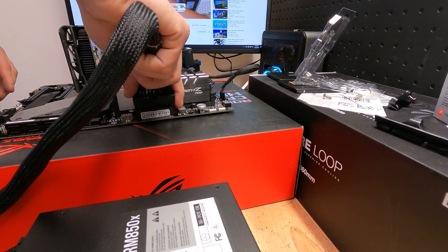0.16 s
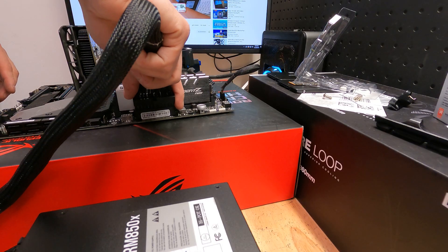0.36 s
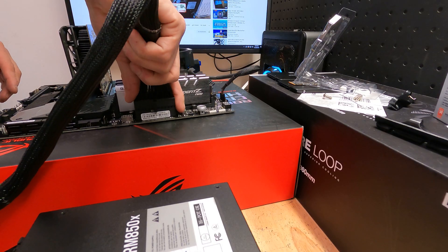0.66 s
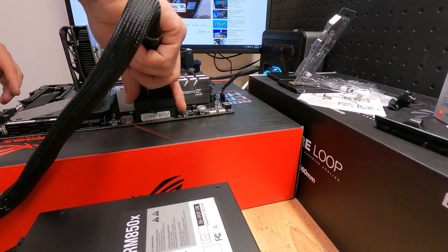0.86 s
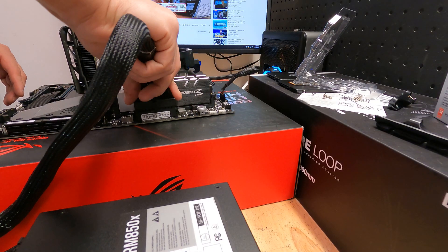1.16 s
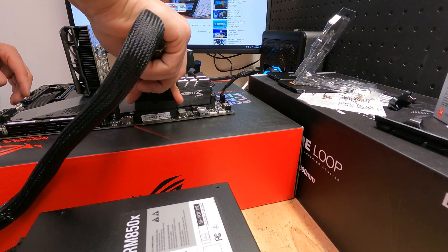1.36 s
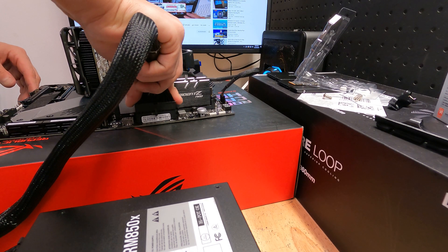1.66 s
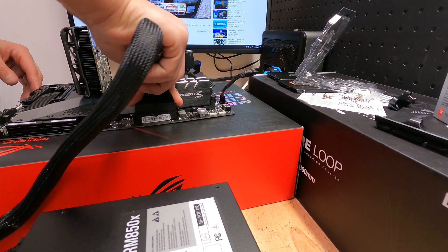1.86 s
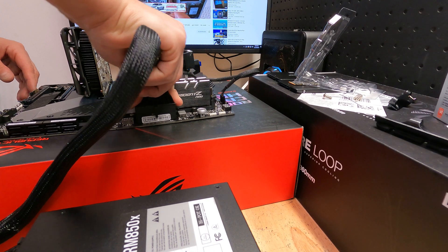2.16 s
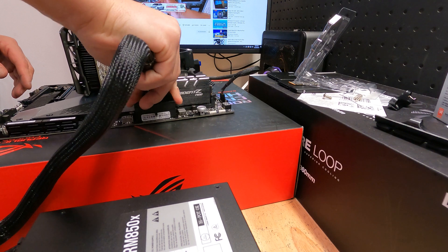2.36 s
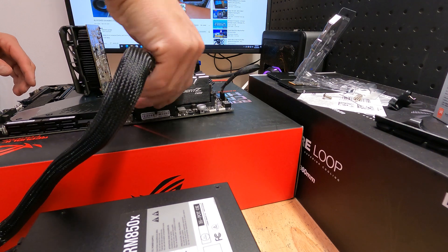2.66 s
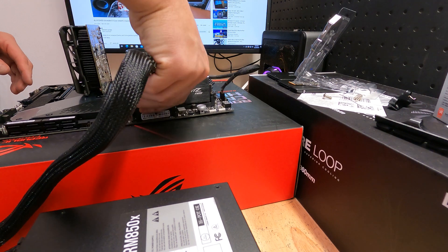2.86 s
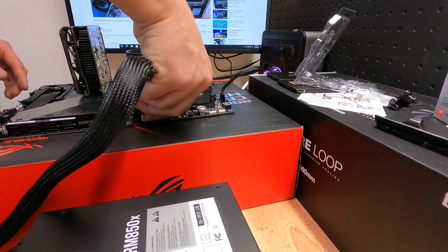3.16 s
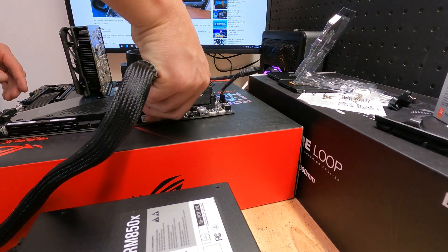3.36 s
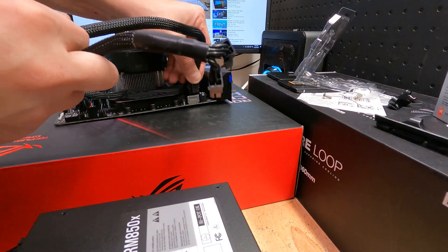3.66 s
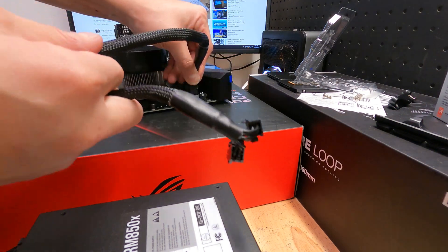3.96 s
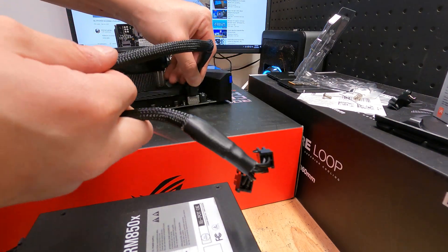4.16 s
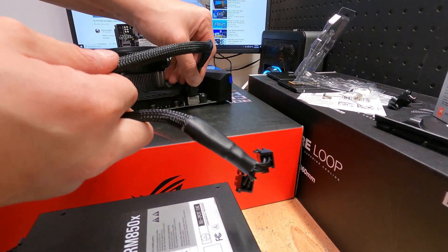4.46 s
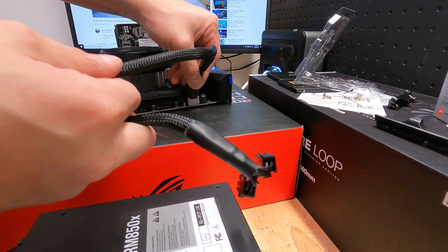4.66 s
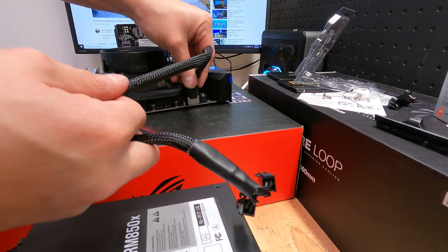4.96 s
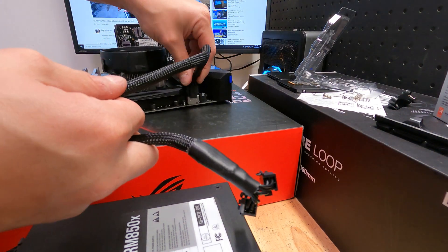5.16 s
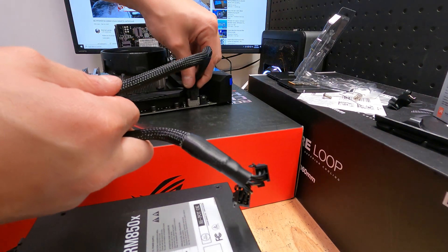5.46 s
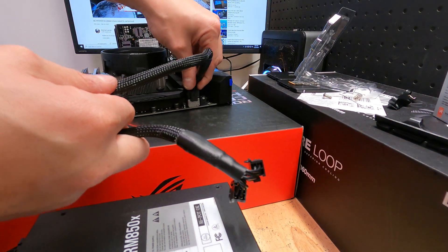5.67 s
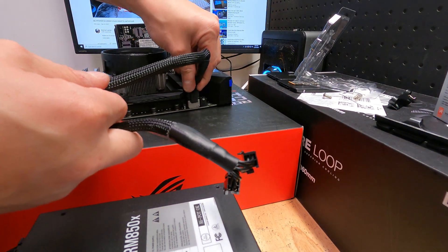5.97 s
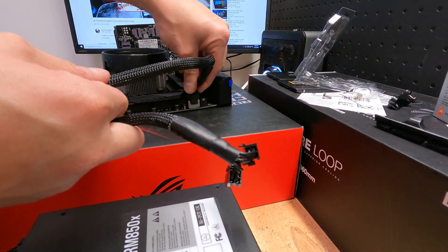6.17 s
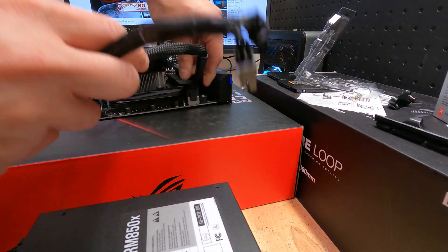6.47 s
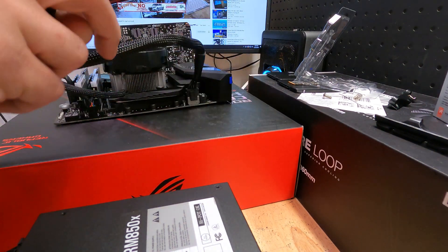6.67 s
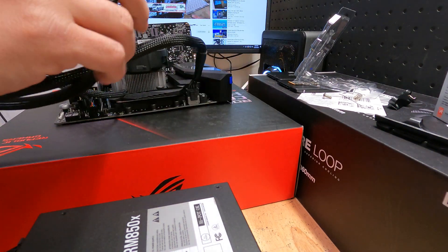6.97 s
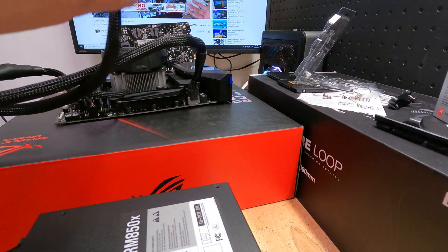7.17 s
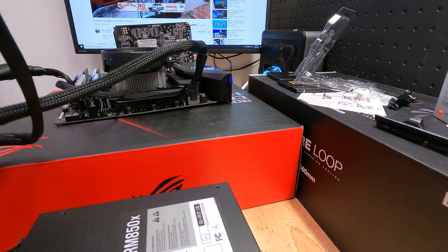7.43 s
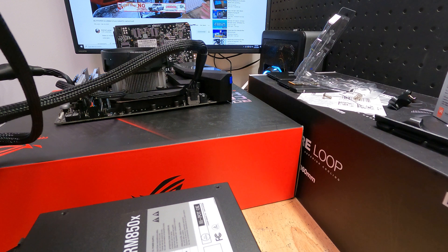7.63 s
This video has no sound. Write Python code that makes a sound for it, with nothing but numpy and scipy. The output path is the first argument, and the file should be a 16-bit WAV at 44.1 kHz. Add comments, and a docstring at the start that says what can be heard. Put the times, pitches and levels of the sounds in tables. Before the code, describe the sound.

Over the faint, steady rush of a fan, a tight plastic plug is worked into a circuit board lying on a cardboard box. It creaks, knocks and clicks home, the box thumping hollowly under each push while braided cables scrape softly. A second plug clicks once, then seats with the loudest snap, leaving a brief thin ring in metal cooler fins. The sound is close, in a small room.

```python
"""Over the steady rush of a fan come clicks and hollow thumps: power plugs are being worked into a
circuit board that lies on a cardboard box. The tight plastic creaks, knocks on the board and snaps home,
the box thumps under each push, and braided cable sleeves scrape. The second plug, behind the cooler,
snaps loudest and sets the fins ringing. A small room answers; the sound is close and almost mono."""
import sys
import numpy as np
from scipy import signal
from scipy.fft import rfft, irfft
from scipy.io import wavfile

SR = 44100
rng = np.random.default_rng(int(sys.argv[2]) if len(sys.argv) > 2 else 0)


def put_to_file(sound):
    """Save the sound as 16-bit audio at rate SR, in the file named by the first command-line argument."""
    columns = np.atleast_2d(sound).T  # one column per channel
    safe = np.clip(columns, -1, 1)
    whole_steps = np.round(safe * 32767)
    wavfile.write(sys.argv[1], SR, whole_steps.astype(np.int16))


N = 343980
T = np.arange(N) / SR
HIT_T = T[:SR * 3 // 4]  # time axis of one hit
SECOND_PLUG_S = 4.0  # later snaps come from behind the cooler


def undb(db):
    """Turn decibels into a gain."""
    return 10 ** (np.asarray(db) / 20)


def unit(x):
    """Scale to an energy of one."""
    return x / np.sqrt(np.sum(x ** 2))


def level(x, db):
    """Scale to an average (rms) level."""
    return x * undb(db) / np.sqrt(np.mean(x ** 2))


def hit_level(x, db):
    """Scale a hit as if all its energy fell within 10 ms."""
    return unit(x) * undb(db) * np.sqrt(SR / 100)


def add(out, s, x):
    """Mix x into out from time s."""
    i = max(int(s * SR), 0)
    out[i:i + len(x)] += x[:N - i]


def fade(t60):
    """Die away by 60 dB in t60 seconds."""
    return np.exp(-np.log(1000) * HIT_T / t60)


def band(x, hz, width_hz):
    """A resonance: keep the sound near one pitch."""
    b, a = signal.iirpeak(min(hz, SR / 2 - 1), hz / min(width_hz, SR / 4), fs=SR)
    return signal.lfilter(b, a, x + 1e-18)


def keep(x, hz, side, order=2):
    """Keep the "low" or the "high" side of hz."""
    return signal.sosfilt(signal.butter(order, min(hz, .45 * SR), side, fs=SR, output="sos"), x + 1e-18)


def ring(tones):
    """A struck object rings with several fading tones."""
    return sum(undb(db) * fade(t60) * np.sin(2 * np.pi * hz * HIT_T) for hz, db, t60 in tones)


# rush of the fan and room air: f/Hz, relative level/dB
AIR_SPECTRUM = [(15, -28.5), (25, -6), (38, -8.5), (64, -5.5), (119, -10), (209, -17.5), (297, -25),
                (340, -31), (378, -17.5), (410, -25), (482, -22), (666, -22), (1050, -20.5), (2170, -34.5),
                (15500, -45)]
# resonances of the fan housing: f/Hz, width/Hz, level/dB
FAN_RESONANCES = [(298.5, 14.5, -71.5), (1053, 1000, -70), (4220, 370, -83)]


def fan():
    """Air rushes steadily through the fan housing; the low rumble wavers."""
    air_hz, air_db = np.transpose(AIR_SPECTRUM)
    f = np.maximum(np.arange(N // 2 + 1) * SR / N, 1)
    shape = undb(np.interp(np.log(f), np.log(air_hz), air_db))
    air = level(irfft(rfft(rng.standard_normal(N)) * shape, N), db=-61)
    waver_db = 2 * level(keep(rng.standard_normal(N), 3.3, "low"), db=0)
    air += keep(air, 180, "low", order=1) * (undb(waver_db) - 1)
    housing = sum(level(band(rng.standard_normal(N), hz, width), db) for hz, width, db in FAN_RESONANCES)
    return air + housing


def room(x, low_t60=0.44, mid_t60=0.51):
    """Echoes in a small furnished room build up and blur; the treble dies first."""
    low, mid, high = rng.standard_normal((3, len(HIT_T)))
    tail = undb(1.5) * keep(low, 990, "low") * fade(low_t60)
    tail += keep(keep(mid, 900, "high"), 6000, "low", order=4) * fade(mid_t60)
    tail += undb(5) * keep(keep(high, 5500, "high"), 12000, "low") * fade(mid_t60 / 2)
    build_up = 1 - np.exp(-HIT_T / 0.01)
    return signal.fftconvolve(x, unit(tail * build_up))[:N]


# the hand leans in to seat a plug: t/s, level/dB, hold/s
HAND_LEANS = [(.1, -58.5, .5), (1.97, -45.5, .4), (4.75, -51.5, 0.13), (6.2, -52.5, .2)]


def sway(rise_s=0.12, fall_s=0.27):
    """The leaning hand rocks the box, moving air at the very bottom of hearing."""
    rumble = keep(band(rng.standard_normal(N), hz=6.4, width_hz=14.7), 31, "low")
    weight = undb(-61)  # a little is always there
    for s, db, hold_s in HAND_LEANS:
        before, after = np.maximum(s - T, 0), np.maximum(T - s - hold_s, 0)
        weight = weight + undb(db) * np.exp(-before / rise_s - after / fall_s)
    return level(rumble, db=0) * weight


def slips(length_s, per_s, spread_db=2.5):
    """Surfaces stick and slip, making tiny clicks of uneven spacing and size."""
    gap, size, direction = rng.standard_normal((3, 1024))
    at = (np.cumsum(np.exp(gap / 2)) * SR / per_s).astype(int)
    out = np.zeros(int(length_s * SR))
    inside = at < len(out)
    out[at[inside]] = (undb(spread_db * size) * np.sign(direction))[inside]
    return out


def slide(peak_s, half_s, db, hz, width_hz, slips_per_s=660):
    """One sliding touch: its tiny clicks swell and fade in a resonance."""
    clicks = slips(4 * half_s, slips_per_s)
    swell = np.exp(-np.linspace(-2, 2, len(clicks)) ** 2)
    grains = keep(band(clicks * swell, hz, width_hz), 1.13 * hz, "low")
    out = np.zeros(N)
    add(out, peak_s - 2 * half_s, unit(grains) * undb(db) * np.sqrt(half_s * SR))
    return out


# the cable drags on the box: peak t/s, level/dB
CABLE_DRAGS = [(0.349, -59), (1.265, -58), (2.11, -61), (3.621, -62), (3.957, -66)]


def drags():
    """The dragging cable draws one low tone from the box."""
    return sum(slide(s, half_s=.05, db=db, hz=304.5, width_hz=10) for s, db in CABLE_DRAGS)


# sleeves and fingers slide: peak t/s, half length/s, level/dB, f/Hz
SLEEVE_RUBS = [(0.102, 0.027, -60, 1540), (.666, 0.066, -52, 256), (.669, 0.034, -53, 1600),
               (0.672, 0.029, -55.5, 3550), (1.384, .05, -68, 3780), (1.67, 0.024, -61.5, 2360),
               (2.614, .036, -59.5, 3700), (4.917, 0.039, -64, 3400), (5.148, 0.036, -65.5, 4530),
               (6.422, .016, -61, 2540), (7.022, 0.058, -63.5, 6340), (7.274, 0.032, -64.5, 7760),
               (7.389, 0.088, -52, 100)]


def rubs():
    """Braided sleeves and fingers scrape with a broad, grainy noise."""
    return sum(slide(s, half_s, db, hz, width_hz=0.82 * hz) for s, half_s, db, hz in SLEEVE_RUBS)


# tight plastic is twisted: peak t/s, half length/s, level/dB, f/Hz
PLASTIC_SQUEAKS = [(2.617, 0.015, -57, 3510), (3.467, .04, -70, 3700)]


def squeaks():
    """Twisted plastic slips quickly and squeaks in a narrow band."""
    return sum(slide(*squeak, width_hz=110, slips_per_s=2500) for squeak in PLASTIC_SQUEAKS)


def push(ringing, contact_s):
    """A rounded push sets something ringing: the longer the contact, the duller the sound."""
    force = HIT_T * np.exp(-4 * HIT_T / contact_s)
    return signal.fftconvolve(force, ringing)[:len(HIT_T)]


# tones of the cardboard box: f/Hz, level against the lid/dB, fade time/s
BOX_TONES = [(114, -3.5, 0.17), (176, -3, 0.071), (244, -15, 0.053), (300.4, -4.5, 0.21),
             (297, -8.5, 0.047), (356, -21, 0.47)]


def box_thump(db, lid_hz, contact_cycles):
    """The lid bounces and the box rings along; the lid's pitch depends on where the hand presses."""
    lid = ring([(lid_hz, 0, .28)])
    return hit_level(push(lid + ring(BOX_TONES), contact_cycles / lid_hz), db)


# soft bumps on the box: t/s, level/dB, lid f/Hz
BOX_NUDGES = [(.691, -44, 89), (1.014, -42, 96.4), (1.624, -49.5, 110), (2.774, -45, 73), (2.972, -48, 77),
              (3.53, -41, 77), (4.004, -45, 73.4), (4.099, -41, 68), (4.911, -42.5, 73), (6.212, -35.5, 70),
              (7.022, -47, 95), (7.349, -54, 101)]


def nudges():
    """Hand and cable bump the box, which thumps softly."""
    out = np.zeros(N)
    for s, db, lid_hz in BOX_NUDGES:
        add(out, s, box_thump(db, lid_hz, contact_cycles=.3))
    return out


# tones of the circuit board: f/Hz, relative level/dB, fade time/s
BOARD_TONES = [(330, -15, 0.12), (470, -27, 0.023), (524, -22, 0.15), (708, -5.5, 0.11), (761, -6.5, 0.078),
               (890, -32, 0.076)]


def board_ring():
    """The circuit board rings briefly after a tap."""
    return ring(BOARD_TONES)


# a tight plug creaks in its socket: start t/s, length/s, level/dB
PLUG_CREAKS = [(.612, 0.084, -58.5), (1.558, 0.072, -62.5), (1.642, 0.046, -56), (1.768, .068, -57),
               (1.9, 0.099, -58.5)]


def creaks():
    """The plug moves in tiny jerks that shake the board."""
    out = np.zeros(N)
    for s, length_s, db in PLUG_CREAKS:
        clicks = slips(length_s, per_s=2200)
        grip = np.sqrt(np.hanning(len(clicks)))
        judder = signal.fftconvolve(band(clicks * grip, hz=520, width_hz=420), board_ring())
        add(out, s, unit(judder) * undb(db) * np.sqrt(length_s * SR))
    return out


def crack(t60, clatter_db):
    """A sharp crack, then a clatter of echoes from things on the bench; their treble dies first."""
    burst, body, treble = rng.standard_normal((3, len(HIT_T)))
    clatter = keep(body, 5000, "low", order=4) * fade(t60)
    clatter += keep(treble, 4700, "high", order=4) * fade(0.095)
    return unit(burst * fade(.0045)) + undb(clatter_db) * unit(clatter)


# the plug hits the board: t/s, board level/dB, struck spot f/Hz, box level/dB, lid f/Hz
PLUG_KNOCKS = [(0.105, -48, 309, -31.5, 79), (.262, -46, 262, -34.5, 90.5), (.269, -48.5, 483, -37.5, 74.4),
               (.985, -50.5, 288, -48, 161), (2.014, -37, 717, -28, 70), (2.02, -41, 200, -40, 149),
               (2.031, -41, 305, -39.5, 112), (2.0948, -44.5, 730, -36, 55), (2.291, -50.5, 596, -41, 68),
               (3.3492, -44.5, 548, -43.5, 101), (4.709, -46, 296, -37, 99), (4.737, -52, 190, -29, 64),
               (4.748, -36, 255, -36, 140), (5.3316, -51.5, 360, -42.5, 107),
               (6.149, -32.5, 282, -22.5, 56.2), (6.154, -44, 714, -46, 113), (6.166, -41, 530, -24, 88)]


def knocks(lid_lag_s=0.00796):
    """The plug gives way and strikes the board; the box below thumps a moment later."""
    out = np.zeros(N)
    for s, board_db, hz, box_db, lid_hz in PLUG_KNOCKS:
        board = push(board_ring(), contact_s=0.32 / hz)
        rattle = keep(band(crack(t60=0.46, clatter_db=12), hz, 0.38 * hz), 1.27 * hz, "low")
        spot = unit(rattle) + undb(6) * unit(ring([(hz, 0, .045)]))
        spot_db = 2.5 - 7.5 * np.log2(hz / 400)  # a slack, low spot stands out more
        add(out, s, hit_level(unit(board) + undb(spot_db) * unit(spot), board_db))
        add(out, s + lid_lag_s, box_thump(box_db, lid_hz, contact_cycles=0.39))
    return out


# tones of the cooler fins: f/Hz, relative level/dB, fade time/s
FIN_TONES = [(3450, -17, .3), (3730, -1, 0.87), (3900, 26.5, 0.39), (3980, -10, .55), (4200, -20, .55),
             (4180, -2, 0.96), (4530, -10, 0.39)]


def fins(shaking):
    """Nearby snaps shake the cooler fins, which ring on with a thin, high tone."""
    return undb(-24) * signal.fftconvolve(shaking, unit(ring(FIN_TONES)))[:N]


# housing and latch snap: t/s, level/dB, part f/Hz, part level against the housing/dB, treble limit/Hz
PLUG_SNAPS = [(0.107, -59, 1030, -4, 3400), (0.2667, -49, 1055, 1.5, 3320), (1.102, -58.5, 3400, -22, 6350),
              (1.648, -62.5, 4200, -9, 8000), (1.827, -54, 4250, -8, 14800), (1.8397, -48, 4100, -5, 16000),
              (2.015, -49.5, 1870, -20, 4630), (2.028, -46, 3300, -2, 7500), (2.034, -47, 4230, 1, 6200),
              (2.0948, -39.5, 3970, 3, 8100), (2.096, -44.5, 8300, 2, 10700), (2.29, -58.5, 1730, -3, 4000),
              (3.351, -56, 3600, -14, 4740), (4.7074, -38.5, 1210, 3.5, 5400), (6.143, -52, 1460, -4, 5000),
              (6.147, -29, 2800, -11.5, 15000), (6.15, -37, 5700, 10, 13000),
              (6.165, -32, 1260, -1.5, 4900), (6.173, -35.5, 4340, 5, 4800), (6.184, -34, 2200, -6, 4500),
              (6.456, -57, 1630, -6, 6200), (6.465, -69, 6400, 6, 7800), (6.567, -62, 6200, -2, 7900),
              (7.208, -69, 6660, 0, 13000), (7.465, -63.5, 6000, -8, 12000)]


def snaps():
    """Each snap rings the plug's plastic housing and the small part that let go."""
    # housing resonances: f/Hz, width/Hz, relative level/dB
    resonances = [(1580, 2600, 6.0), (2460, 1800, -7.5), (3550, 1360, 6.5), (4040, 980, -13),
                  (6240, 380, 7), (9200, 2700, 0.5), (13500, 5800, -0.5)]
    out = np.zeros(N)
    for s, db, hz, part_db, treble_hz in PLUG_SNAPS:
        clatter_db = 10 - 4 * np.log2(treble_hz / 4000)  # a sharper snap is a cleaner break
        clatter_t60 = 0.11 if s < SECOND_PLUG_S else 0.12  # echoes last longer behind the cooler
        click = crack(clatter_t60, clatter_db)
        housing = sum(undb(gain_db) * band(click, f, width) for f, width, gain_db in resonances)
        housing = keep(housing, treble_hz, "low", order=3)
        t60 = 0.071 * (1200 / hz) ** 0.41  # stiffer, higher parts stop sooner
        part_tones = ring([(hz, 0, t60), (1.06 * hz, -5, t60)])
        part_noise = band(band(click, hz, 0.3 * hz), hz, 0.3 * hz)
        part = unit(part_noise) + undb(-2.5) * unit(part_tones)
        add(out, s, hit_level(unit(housing) + undb(part_db) * unit(part), db))
    return out


def scene():
    """Plugs, board and box sound in one room, over the fan."""
    plastic = snaps()
    behind_cooler = plastic * (T > SECOND_PLUG_S)
    near = plastic + fins(behind_cooler) + knocks() + nudges() + rubs() + squeaks() + drags() + creaks()
    # the hidden socket is heard more by way of the room
    echoes = room(undb(-19) * near + undb(-22) * behind_cooler)
    mono = near + echoes + sway() + fan()
    return np.array([mono, mono])


def record(dry, top_hz=15600):
    """Each channel gets its own faint hiss, then the highest treble is cut off."""
    hiss = undb(-81.5) * rng.standard_normal(dry.shape)
    return signal.sosfilt(signal.ellip(10, .2, 80, top_hz, fs=SR, output="sos"), dry + hiss)


dry = scene()
out = record(dry)
put_to_file(out)
```